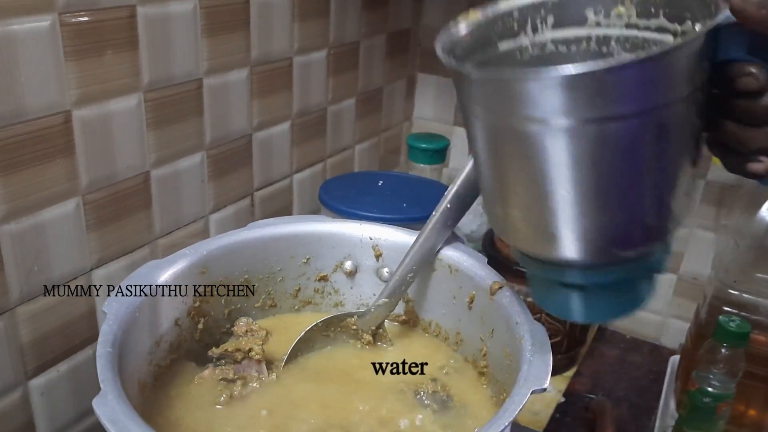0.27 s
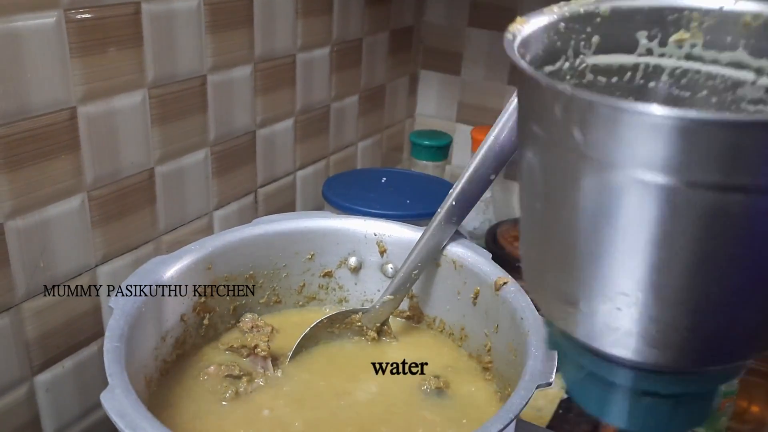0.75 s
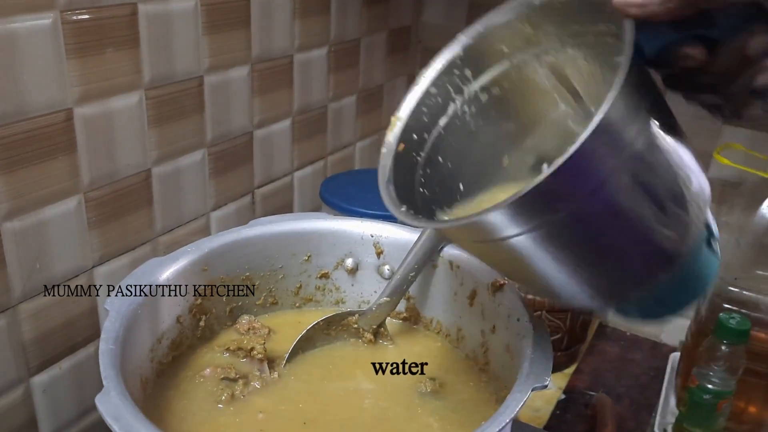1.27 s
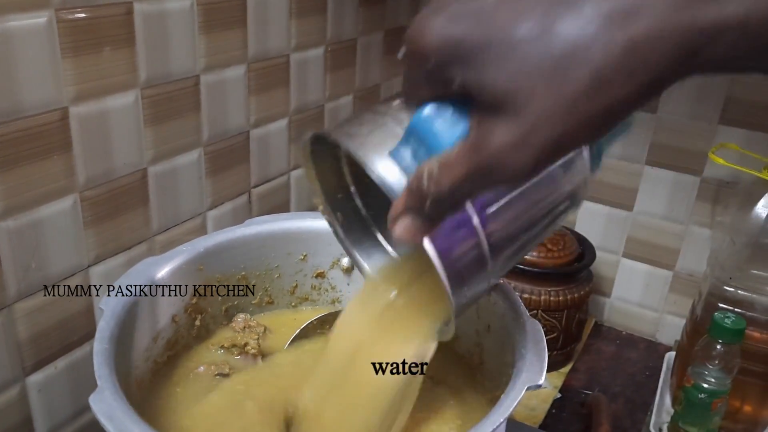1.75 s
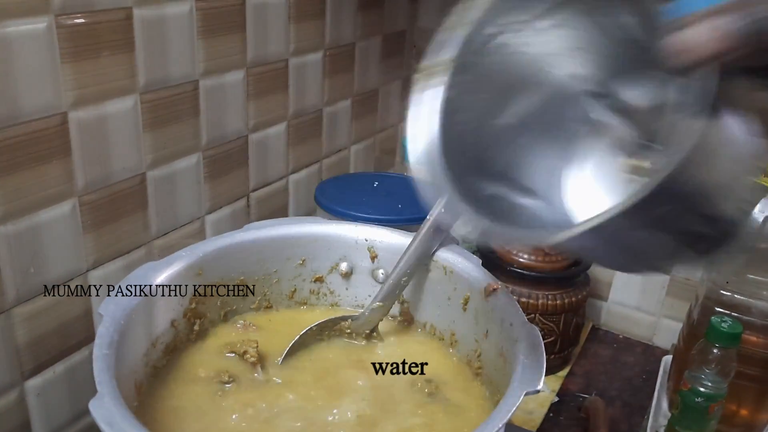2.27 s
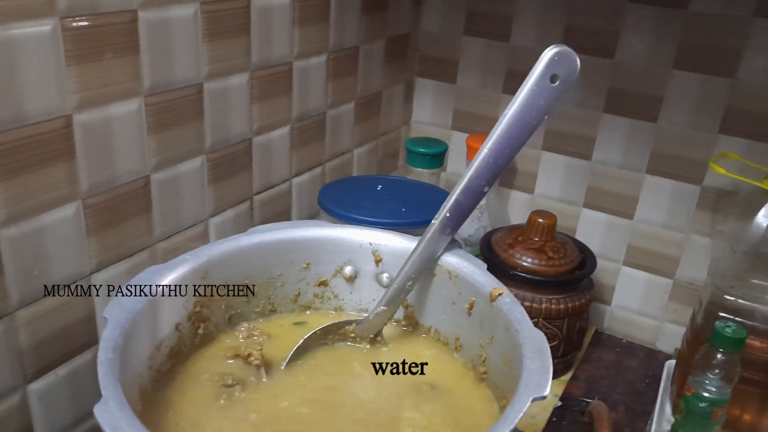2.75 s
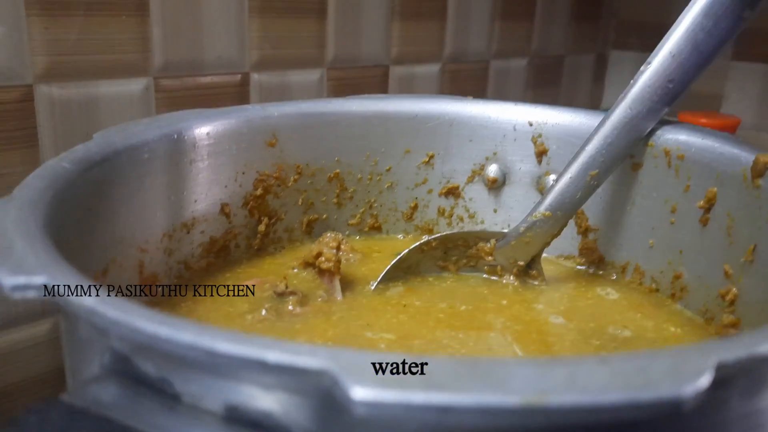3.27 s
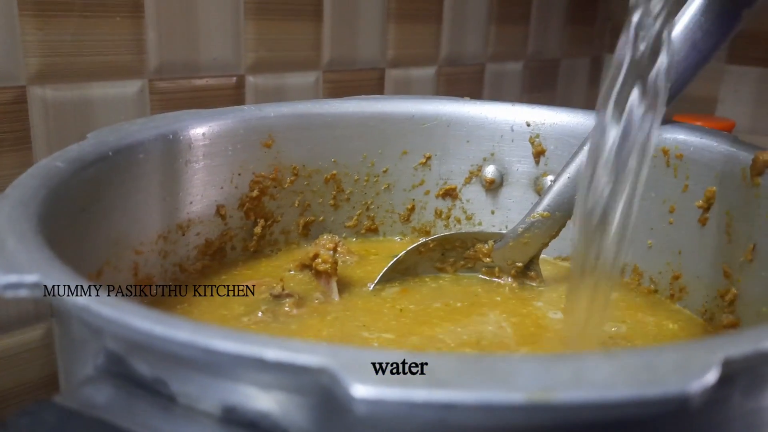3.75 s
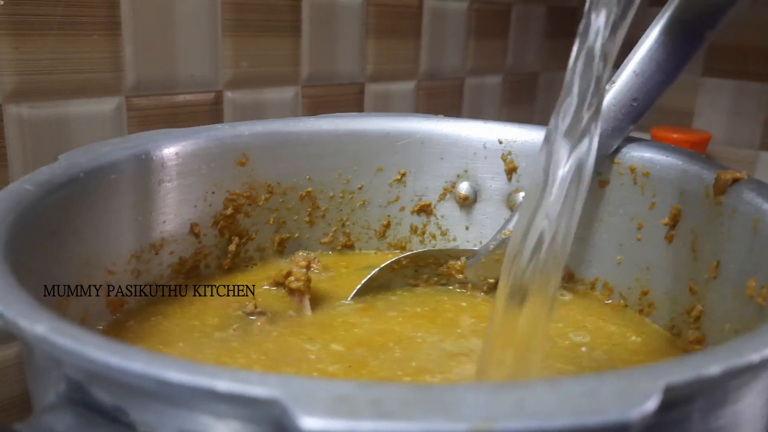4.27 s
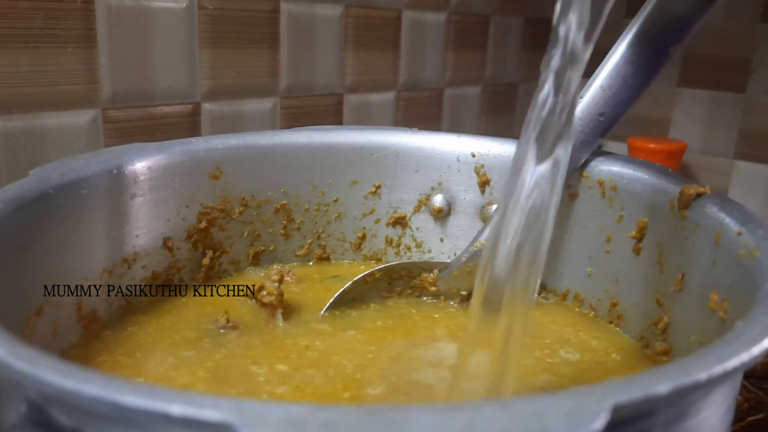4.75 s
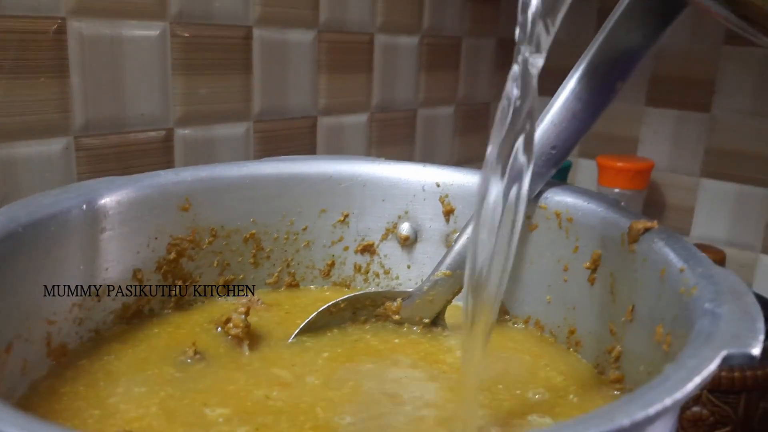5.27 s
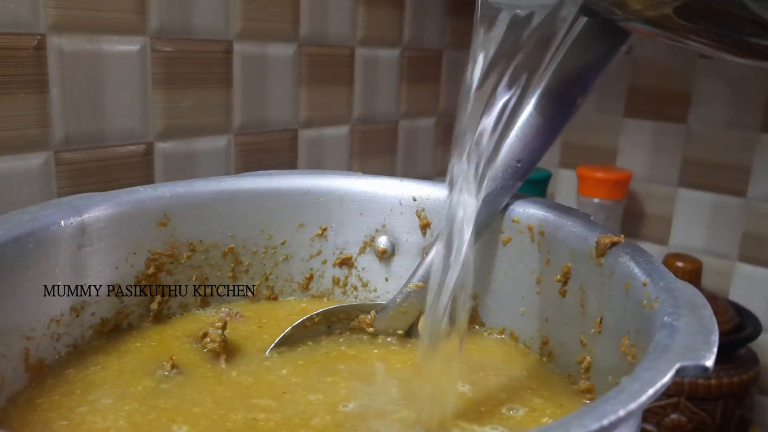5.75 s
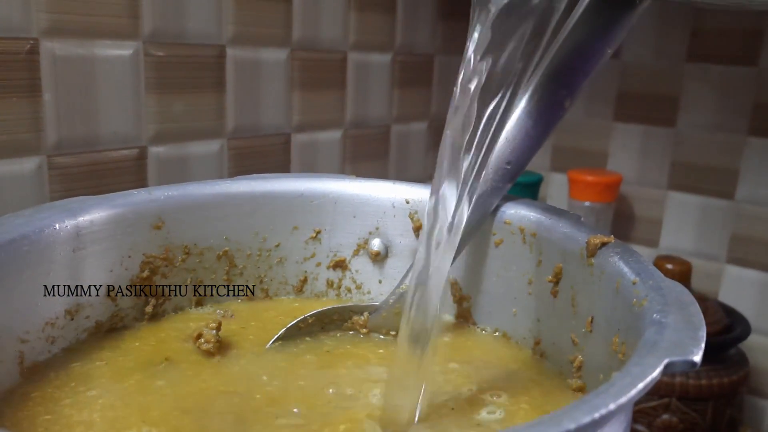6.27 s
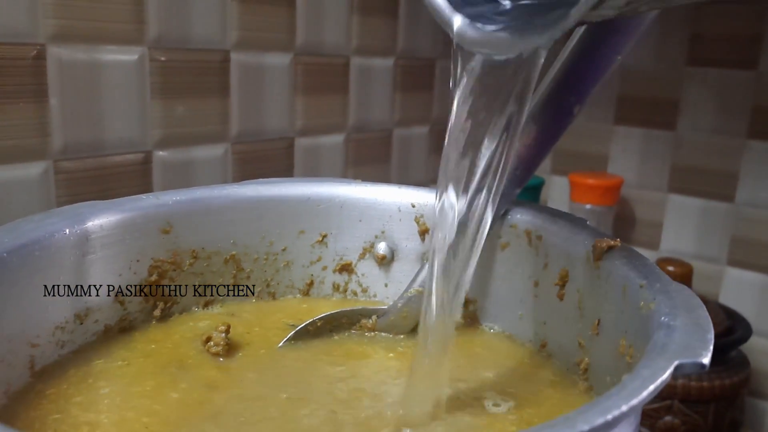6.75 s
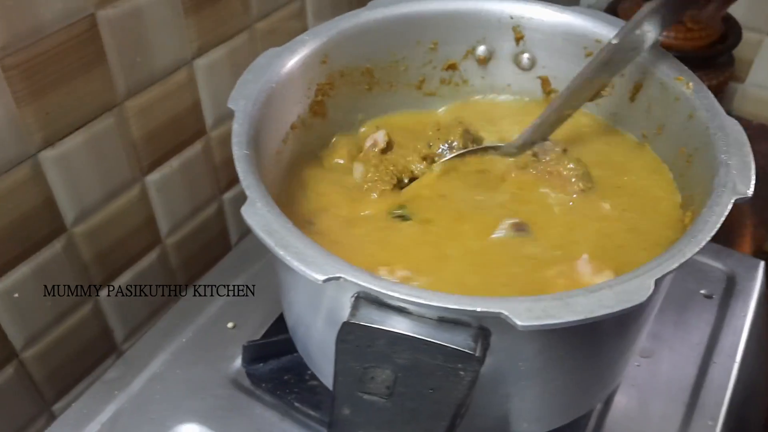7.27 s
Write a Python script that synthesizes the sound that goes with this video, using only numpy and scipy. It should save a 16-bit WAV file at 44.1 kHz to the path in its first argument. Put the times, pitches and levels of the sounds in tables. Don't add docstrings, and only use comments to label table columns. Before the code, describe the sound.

Silence first, then liquid swirls in a steel jar over faint room hum, with a thin squeak and quick hard clanks. After sparse drips and a light spoon rattle, a heavy gush lands in a metal pot of curry with a low thud. It thins to dribbles with a faint distant bird, then a long bright stream splashes and glugs until it weakens. Close microphone, small tiled kitchen.

```python
import sys
import numpy as np
from scipy import signal
from scipy.fft import rfft, irfft, next_fast_len
from scipy.io import wavfile
from scipy.ndimage import uniform_filter1d

SR = 44100
rng = np.random.default_rng(int(sys.argv[2]) if len(sys.argv) > 2 else 0)


def to_linear_factor(level_db):
    exponent = np.asarray(level_db, float) / 20
    return 10 ** exponent


def store_pcm(level_fs):
    pcm = np.round(np.clip(level_fs, -1, 1) * 32767).astype(np.int16)
    wavfile.write(sys.argv[1], SR, np.atleast_2d(pcm).T)


N = 330970
START_S = .662

# lowest f/Hz, highest f/Hz
SIZES_HZ = [(210, 1100), (1100, 1900), (1900, 3300), (3300, 8600), (8600, 16500)]
# bubbles per second, spread of loudness/dB, swings in which a bubble dies by 20 dB
BUBBLES_PER_S = [600, 700, 1000, 2200, 2500]
SIZE_SPREAD_DB = [2.4, 3.2, 3.4, 4.0, 4.4]
CYCLES = [7, 9, 9, 10, 4]
# f/Hz, width/Hz, level/dB
POT = [(302, 410, 3), (730, 230, 9), (1330, 130, 7.5), (2270, 1200, 4.5), (3873, 160, 9.5), (4630, 1050, 7),
       (7600, 1900, 13)]
# f/Hz, level/dB
SPLASH_COLOUR = [(190, -21), (250, -4.5), (1000, -8), (1700, -10.5), (3400, -9), (5700, -4), (8300, -12.5),
                 (9300, -16), (11000, -7.5), (13000, -7.5), (15800, -6.5)]
# f/Hz, level/dB
THUD = [(25, -38), (50, -20.5), (80, -2.5), (130, -4.5), (170, -14), (400, -52)]

# t/s, flow level/dB against a steady stream, depth level/dB
SLOSH = [
    (.7, 5, -1.5),
    (1.02, 0.5, 0),
    (1.24, 2, 6),
    (1.38, 4.5, 2),
    (1.47, -10.5, -2),
    (1.74, -14, -11.5),
    (1.83, -0.5, 3.5),
    (1.92, -14.5, 7),
    (2.29, -22, 7),
]
DUMP = [
    (2.8, -41, -1),
    (2.83, 0, 2),
    (2.888, 15, 7.5),
    (2.944, 14.5, 11),
    (3.118, 7.5, 6.5),
    (3.344, -12.5, 1),
    (3.56, -18, -15),
    (4.0, -21.5, -4),
    (4.21, -32, 8),
]
POUR = [(4.226, 1, -1), (4.33, -1, -2.5), (4.62, -1.5, 4.5), (4.8, -3.5, 4.5), (5.07, 1.5, 6.5),
        (5.14, -1, 4), (5.234, -1, 4), (5.478, -4, 4), (5.6, -0.5, 1.5), (5.67, -8, -10), (5.852, -9, 7),
        (5.97, -10, -39), (6.046, 0.5, -12), (6.15, -1, 4), (6.266, -2.5, 0.5), (6.57, 1.5, -0.5),
        (6.75, -3.5, 2.5), (6.85, -3.5, -11), (7.07, -4, -4)]
STIR = [
    (7.1, -4, -6),
    (7.14, -9, -28),
    (7.24, -18, -24),
    (7.27, -11, -6),
    (7.3, -3, 2),
    (7.4, 3, -6),
    (7.47, -9, 6),
    (7.5, -15, -1.5),
]
# level/dB in a steady stream, dB per dB of flow, dB per dB of depth, level/dB at rest
STREAM_DB = [-61.5, -62, -59.5, -55, -59.5]
FOLLOW_FLOW = [0.59, 0.98, 1.25, 1.01, 0.86]
FOLLOW_DEPTH = [1.27, 0.39, 0.0011, 0.081, -0.13]
SIMMER_DB = [-70, -88, -90, -84, -101]
# start t/s, level/dB, f/Hz, hold t/s
GUSHES = [(1.505, -73.5, 12000, 0.22), (1.816, -58, 2000, .02), (2.5, -70, 12000, .02),
          (4.1, -61, 600, 0.027), (2.61, -75.5, 2000, 0.18), (1.789, -45, 2000, 0.025),
          (4.796, -44, 11000, 0.017), (6.2, -45, 11000, .01), (5.552, -77, 5000, 0.028),
          (3.203, -58.5, 12000, 0.43), (3.302, -65.5, 5000, 0.28), (3.366, -61, 600, 0.025),
          (4.55, -56.5, 600, 0.055), (1.785, -51.5, 5000, 0.02), (5.37, -52, 12000, 0.029),
          (6.053, -58.5, 600, 0.029), (6.487, -62, 12000, 0.24), (6.644, -56, 5000, 0.085),
          (7.11, -58, 12000, 0.13), (7.116, -55, 5000, 0.079), (7.274, -64, 600, 0.067),
          (7.403, -60, 5000, .1), (1.8, -51.5, 1500, .04), (5.075, -58, 600, 0.028),
          (5.075, -57, 1500, 0.026), (7.165, -60.5, 2500, 0.052), (7.3, -63, 1500, 0.043),
          (1.14, -62, 600, 0.19), (6.05, -63, 600, 0.17), (7.25, -62.5, 600, .12), (5.02, -58, 5000, .03),
          (5.19, -57, 5000, .03), (2.5, -70, 5000, 0.028)]
GUSH_RISE_S, GUSH_FALL_DB_PER_S = 0.01, 136

# f/Hz, level/dB
HUM = [(15, -85), (25, -43), (70, -2.5), (149, -21.5), (184, 2), (201, -18.5), (253, 9.5), (276, -20),
       (366, 1.5), (494, -11.5), (540, 0.5), (691, 0.5), (885, -60), (1300, -3), (1700, -24), (2210, -54),
       (3740, -120)]
# f/Hz, level/dB
HUM_LINES = [
    (82, -81),
    (122, -80.5),
]
# f/Hz, level/dB
HISS = [(1500, -24), (1900, 18), (3300, -62), (4400, 11.5), (6200, -4), (7700, 14.5), (9300, -6),
        (11000, 13.5), (12000, -24), (15800, 5.5)]
HUM_DB, HISS_DB = -67, -72

# f/Hz, t/s to fall by 60 dB
TILES = [(200, 0.21), (1000, 0.51), (2000, 0.39), (3000, 0.33), (8000, 0.27), (15000, 0.42)]
# t/s, level/dB
ECHOES = [(.006, -12.5), (0.0124, -7), (.021, -19), (.033, -17.5)]

# t/s, peak level/dB, f/Hz
JAR_POPS = [(.7183, -42, 4900), (.7368, -36.5, 2710), (.7672, -35, 4050), (.7857, -38.5, 1990),
            (.8625, -35.5, 2500), (1.0132, -38, 2200), (1.0346, -40, 4400), (1.0381, -35.5, 2320),
            (1.1045, -38.5, 2200), (1.1249, -38.5, 7370), (1.154, -42, 790), (1.1653, -36, 2430),
            (1.1658, -32.5, 4630), (1.2626, -37, 1730), (1.3095, -36, 7300), (1.327, -42, 1500),
            (1.3267, -35.5, 4000), (1.327, -38, 3300), (1.383, -38, 3400), (1.405, -42, 3700),
            (1.372, -36, 4240), (1.3489, -32.5, 7600), (1.3674, -29.5, 3560), (1.3679, -37, 3110),
            (1.553, -45.5, 1840), (1.7595, -44, 2100), (1.795, -32, 2080), (1.81, -27, 764),
            (1.83, -34, 850), (1.84, -30.5, 2100), (1.823, -35, 1780), (1.895, -47, 7000)]
DRIP_POPS = [(1.9555, -44.5, 7800), (2.012, -45, 1530), (2.012, -47, 2000), (2.0473, -40, 7720),
             (2.1792, -47.5, 4910), (2.1805, -44, 2000), (2.19, -43, 2155), (2.3106, -35.5, 7070),
             (2.339, -44.5, 607), (2.498, -46.5, 7820), (2.6704, -53, 7700), (3.307, -42, 7400),
             (3.475, -40.5, 7240), (3.777, -47, 7000), (4.031, -49, 683), (1.658, -51, 7400),
             (1.742, -52, 7600), (2.312, -43, 7770), (2.327, -48, 6800), (2.804, -54, 7540),
             (2.07, -50, 4900), (2.33, -44, 7700)]
DUMP_POPS = [(2.81, -44, 2220), (2.8255, -33, 1890), (2.826, -37, 4130), (2.826, -37, 3170),
             (2.826, -35, 2550), (2.837, -37, 4130), (2.826, -50, 7300), (2.8655, -28, 1910),
             (2.8665, -18.5, 4580), (2.867, -20, 7600), (2.886, -24, 7760), (2.8864, -16, 4760),
             (2.8914, -26, 1740), (2.9363, -27, 2243), (2.9907, -30.5, 2030), (3.0291, -29, 7450),
             (3.0326, -27.5, 2490), (3.1044, -31, 7530), (3.1049, -44, 2200), (3.1583, -31.5, 7340),
             (3.2102, -34.5, 7440)]
POUR_POPS = [(4.2254, -38.5, 4600), (4.256, -42.5, 4290), (4.824, -32, 4570), (4.401, -31.5, 7060),
             (4.5803, -30, 4750), (4.777, -35, 7130), (4.812, -30, 4440), (5.0076, -33.5, 7160),
             (5.0184, -30.5, 5430), (5.08, -29, 4740), (5.163, -34.5, 3770), (5.188, -28, 7330),
             (5.278, -34, 4440), (5.279, -37, 7500), (5.383, -31, 4540), (5.659, -33, 7460),
             (5.793, -38.5, 4570), (6.0107, -38, 4540), (6.126, -36, 4840), (6.19, -30, 3970),
             (6.2004, -20.5, 7660), (6.27, -35.5, 4520), (6.375, -29, 4520), (6.5247, -35, 6060),
             (6.614, -36.5, 3930), (6.659, -26, 5030), (6.724, -36, 3990), (7.0907, -33, 7830),
             (7.2912, -28, 4950), (7.3604, -34.5, 7780), (7.453, -30.5, 5260),
             (4.473, -44, 637), (4.811, -39, 2600), (4.82, -43, 743), (4.822, -42.5, 481),
              (4.842, -38, 3100), (4.909, -42, 1320), (5.001, -41, 391), (5.0087, -39, 2700),
              (5.077, -32.5, 796), (5.0775, -36.5, 1420), (5.079, -37, 1050), (5.08, -40, 530),
              (5.079, -29.5, 7470), (5.081, -40, 3080), (5.1596, -45, 1420), (5.16, -47, 1980),
              (5.246, -45, 1730), (5.28, -37, 2040), (5.385, -42, 340), (5.9968, -45.5, 2590),
              (6.058, -40, 740), (6.1174, -38.5, 2530), (6.188, -41, 708), (6.1919, -38, 2270),
              (6.3605, -40.5, 1420), (6.436, -39.5, 711), (6.6127, -37, 1440), (6.7915, -44, 2180),
              (7.362, -38.5, 3100), (7.385, -37.5, 800), (7.414, -39.5, 2090),
             (4.2694, -37, 6810), (4.2844, -40, 5780), (4.3444, -42, 4290), (4.371, -41.5, 4340),
            (4.4478, -39, 4420), (4.56, -42, 4800), (4.8224, -32.5, 7770), (4.9771, -36.5, 7500),
            (4.9874, -37, 4690), (5.234, -37, 5240), (5.3642, -37.5, 4630), (5.4735, -42, 4700),
            (5.5662, -45, 4860), (5.5782, -42, 4870), (5.6393, -46, 7600), (5.7667, -40.5, 7500),
            (5.822, -45, 4690), (5.9963, -42.5, 4630), (6.094, -37, 5810), (6.1514, -38, 3840),
            (6.3507, -35, 3900), (6.363, -36, 7600), (6.4133, -37, 6030), (6.5172, -36.5, 6100),
            (6.735, -49, 3910), (6.8374, -42, 4070), (6.8833, -44, 7620), (6.9035, -40, 3890),
            (6.9294, -39, 6000), (7.0229, -47, 6000), (7.219, -38.5, 4850), (7.2594, -47, 7620),
            (7.3863, -39, 4880), (7.423, -43, 3850)]
SPRAY = [(1.4995, -62, 14900), (1.5155, -53, 14600), (1.5943, -47, 13200), (1.6277, -47, 13400),
         (1.658, -57, 10800), (1.6821, -55, 13500), (1.7274, -54, 13800), (1.7429, -53, 13700),
         (1.7699, -54, 11700), (1.9385, -51, 13800), (1.9639, -48, 10400), (1.9894, -55, 11300),
         (2.2374, -66, 10800), (2.3121, -58, 10540)]
CLANKS = [
    (1.7934, -23.5, 3033),
    (1.8298, -19.5, 2968),
    (1.842, -24.5, 2980),
    (1.865, -41, 2960),
]
RATTLE = [(2.6152, -44.5, 1916), (2.626, -50, 2100), (2.645, -50, 1920), (2.6676, -47, 2440),
          (2.667, -48, 1950), (2.69, -53, 2100), (2.7188, -46.5, 2000), (2.719, -52, 2440),
          (2.74, -54, 2200), (2.7602, -44, 1900), (2.761, -52, 2400), (2.78, -54, 2200),
          (2.7966, -44, 1850), (2.797, -49, 2430)]
KNOCK = [
    (4.211, -36, 238),
    (4.21, -38, 627),
    (4.212, -40.5, 1037),
]
RING_S, RING_SLOPE, LONGEST_S = .034, .7, .045
TICK_DB, TICK_DB_PER_OCTAVE, TICK_DB_PER_DB = -22.5, 6, -0.22
STRAY_POPS_PER_S, STRAY_DB, STRAY_SPREAD_DB = 22, -48, 2

# t/s, f/Hz, level/dB
SQUEAK = [
    (1.14, 780, -65),
    (1.188, 777.6, -53),
    (1.31, 774.8, -60),
    (1.4, 771, -74),
]
# multiple of the pitch, level/dB
SQUEAK_TONES = [(1, 8), (2, 3), (3, 2), (4, 6), (5, -2), (6, -1), (7, -18), (8, -19), (9, -10), (10, -2)]
# t/s, f/Hz, level/dB
BIRD = [
    [(3.53, 2950, -63), (3.575, 2720, -53), (3.63, 2280, -61)],
    [(3.55, 1940, -64), (3.7, 1877, -60), (3.82, 1860, -62), (3.95, 1730, -74)],
]


def evened(x):
    return x / np.sqrt(np.mean(x ** 2) + 1e-20)


def read(points, hz):
    f, value = np.transpose(points)
    return np.interp(np.log(hz + 1), np.log(f + 1), value)


def add(mix, s, sound):
    part = mix[round(s * SR):][:len(sound)]
    part += sound[:len(part)]


def steady(points, db, patchy_db):
    frames, hz = N // 512 + 5, np.fft.rfftfreq(2048, 1 / SR)
    a, b, patches = rng.standard_normal((frames, 1025, 3)).T
    patches = uniform_filter1d(patches, 20, 0)
    patches = evened(uniform_filter1d(patches, 8, 1))
    z = (a + 1j * b) * to_linear_factor(read(points, hz)[:, None] + patchy_db * patches)
    noise = signal.istft(z, nperseg=2048, noverlap=1536)[1][:N]
    return to_linear_factor(db) * evened(noise)


def bubble(hz, t60, glide):
    t = np.arange(round(max(t60, .001) * SR) + 40) / SR
    dying = to_linear_factor(-60 * t / max(t60, .001))
    opening = 1 - np.exp(-t * hz * 2)
    return dying * opening * np.sin(2 * np.pi * hz * t * (1 + glide * t / t60))


def room(x, wet_db):
    taps = np.zeros(SR // 2)
    at = np.arange(440, SR // 2 - 20, 20)
    taps[at + rng.integers(0, 20, len(at))] = rng.choice([-1., 1.], len(at))
    hz, t, z = signal.stft(taps, SR, nperseg=256)
    fading = to_linear_factor(-60 * t / read(TILES, hz)[:, None])
    tail = signal.istft(z * fading, SR, nperseg=256)[1]
    tail = to_linear_factor(wet_db) * tail / np.linalg.norm(tail)
    tail[0] += 1
    for s, db in ECHOES:
        tail[round(s * SR)] += to_linear_factor(db)
    return signal.fftconvolve(x, tail)[:N]


def control(t):
    s, flow_db, depth_db = np.transpose(SLOSH + DUMP + POUR + STIR)
    return np.interp(t, s, flow_db), np.interp(t, s, depth_db)


def size_levels():
    t = np.arange(N) / SR
    flow_db, depth_db = control(t)
    power = []
    for base, a, b, rest in zip(STREAM_DB, FOLLOW_FLOW, FOLLOW_DEPTH, SIMMER_DB):
        power.append(to_linear_factor(base + a * flow_db + b * depth_db) ** 2 + to_linear_factor(rest) ** 2)
    for s, db, hz, hold in GUSHES:
        rise = np.clip((t - s) / GUSH_RISE_S, 0, 1)
        falling_s = np.maximum(t - s - GUSH_RISE_S - hold, 0)
        size = sum(hz > hi for lo, hi in SIZES_HZ)
        power[size] += (rise * to_linear_factor(db - GUSH_FALL_DB_PER_S * falling_s)) ** 2
    return 10 * np.log10(power)


def thud(large_db):
    push_db = uniform_filter1d(large_db, size=8000) + 54.5
    return steady(THUD, -69.5, patchy_db=3.5) * to_linear_factor(0.48 * push_db)


def splash():
    levels, padded = size_levels(), next_fast_len(N)
    hz, out = np.fft.rfftfreq(padded, 1 / SR), np.zeros(N)
    pot_db = sum(db / (1 + (2 * (hz - f) / w) ** 2) for f, w, db in POT)
    pot = to_linear_factor(read(SPLASH_COLOUR, hz) + pot_db)
    clumps_db = 3.6 * evened(uniform_filter1d(rng.standard_normal(N), size=1000))
    sizes = zip(SIZES_HZ, BUBBLES_PER_S, SIZE_SPREAD_DB, CYCLES, levels)
    for (lo, hi), rate, spread_db, cycles, db in sizes:
        loudness = to_linear_factor(spread_db * np.minimum(rng.exponential(1, N), 4) + clumps_db)
        births = loudness * (rng.random(N) < rate / SR)
        kind = rng.integers(0, 7, N)
        swarm = np.zeros(N)
        for k, f in enumerate(np.geomspace(lo, hi, num=7)):
            swarm += signal.oaconvolve(births * (kind == k), bubble(f, 3 * cycles / f, 0.11))[:N]
        swarm = rfft(room(swarm, -1.2), padded)
        swarm /= uniform_filter1d(abs(swarm), size=3000)
        band = 1 / np.sqrt((1 + (lo / (hz + 1)) ** 16) * (1 + (hz / hi) ** 16))
        out += evened(irfft(swarm * pot * band, padded)[:N]) * to_linear_factor(db)
    return out + thud(levels[0])


def house():
    out = steady(HUM, HUM_DB, patchy_db=3.0)
    out += steady(HISS, HISS_DB, patchy_db=2.5)
    for hz, db in HUM_LINES:
        waver = uniform_filter1d(rng.standard_normal((2, N)), 5000)
        turning = np.exp(2j * np.pi * hz * np.arange(N) / SR)
        out += to_linear_factor(db) * evened(((waver[0] + 1j * waver[1]) * turning).real)
    return out


def bursts(rows, stretch, spread, open_s):
    rings, ticks = np.zeros(N), np.zeros(N)
    fade = to_linear_factor(-60 * np.arange(300) / (0.02 * SR))
    for (s, db, hz), chance in zip(rows, rng.standard_normal((len(rows), 303))):
        tick_db = TICK_DB + TICK_DB_PER_OCTAVE * np.log2(hz / 2000) + TICK_DB_PER_DB * (db + 56)
        t60 = stretch * min(RING_S * (2000 / hz) ** RING_SLOPE, LONGEST_S)
        neighbours = sum(bubble(hz * (1 + spread * c), t60, 0.033) for c in chance[:3])
        ring = bubble(hz, t60, 0.015) + 0.46 * neighbours
        ring *= np.minimum(np.arange(len(ring)) / (open_s * SR), 1)
        add(rings, s, to_linear_factor(db - 3.0) * ring / abs(ring).max())
        add(ticks, s, to_linear_factor(db + tick_db) * chance[3:] * fade)
    bright = signal.butter(2, [3000., 15000.], "band", fs=SR, output="sos")
    return rings + signal.sosfilt(bright, ticks)


def stray_pops():
    at, which, detune, spread = rng.random((330, 4)).T
    s = np.cumsum(-np.log(1 - at)) / STRAY_POPS_PER_S + START_S
    notes_hz = np.array([f for f, w, db in POT[3:]])
    hz = notes_hz[(which * 4).astype(int)] * (1 + .12 * (detune - .5))
    db = STRAY_DB + control(s)[0] + STRAY_SPREAD_DB * (2 * spread - 1)
    return list(zip(s, db, hz))


def liquid_pops():
    rows = JAR_POPS + DRIP_POPS + DUMP_POPS + POUR_POPS + stray_pops()
    return bursts(rows, 1.0, 0.051, .0009)


def spray():
    return bursts(SPRAY, .45, .1, .0003)


def steel():
    return bursts(CLANKS, 2.3, 0.0186, .0007) + bursts(RATTLE, 1.25, .06, .0015)


def knock():
    return bursts(KNOCK, 1.0, .15, .002)


def pops():
    bubbles = liquid_pops()
    close = spray() + knock()
    return room(bubbles + steel() + 0.35 * close, -2.5) + .7 * close


def whistle(rows, tones, rough):
    s, hz, db = np.transpose(rows)
    t = np.arange(s[0], s[-1], 1 / SR)
    wobble = 1 + rough * evened(uniform_filter1d(rng.standard_normal(len(t)), 300))
    turns = np.cumsum(np.interp(t, s, hz) * wobble) / SR
    tone = sum(to_linear_factor(d) * np.sin(2 * np.pi * k * turns) for k, d in tones)
    flutter_db = 3.8 * evened(uniform_filter1d(rng.standard_normal(len(t)), size=400))
    strength = np.sqrt(2) * to_linear_factor(np.interp(t, s, db) + flutter_db)
    return s[0], strength * tone * signal.windows.tukey(len(t), .15)


def squeak():
    out = np.zeros(N)
    add(out, *whistle(SQUEAK, SQUEAK_TONES, 0.011))
    return out


def bird():
    out = np.zeros(N)
    for rows in BIRD:
        add(out, *whistle(rows, [(0.98, 0.005)], 0.0285))
    return out


def far_sounds():
    return room(to_linear_factor(-9.0) * squeak() + to_linear_factor(-15.5) * bird(), 1.7)


def scene():
    sounds = splash() + house() + pops() + far_sounds()
    started = np.arange(N) >= START_S * SR
    return (sounds * started)[None]


def low_pass(x):
    return signal.sosfilt(signal.butter(12, 16500, fs=SR, output="sos"), x)


def record(dry):
    limit = signal.firwin(255, 15900, window=("kaiser", 9), fs=SR)
    mix = signal.oaconvolve(dry, limit[None], "same")
    return low_pass(mix)


dry = scene()
out = record(dry)
store_pcm(out)
```